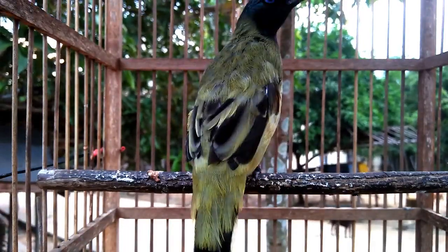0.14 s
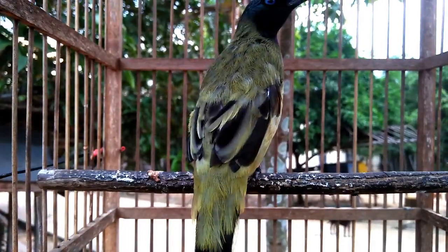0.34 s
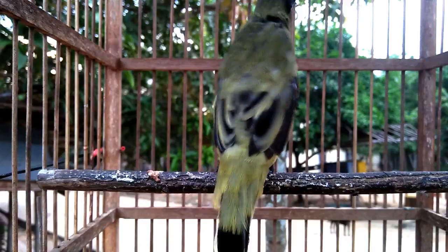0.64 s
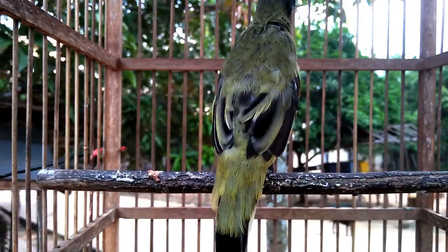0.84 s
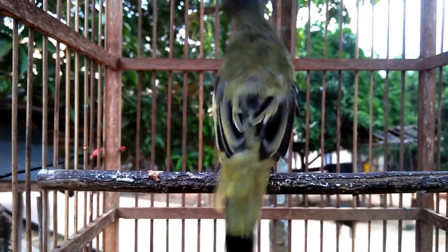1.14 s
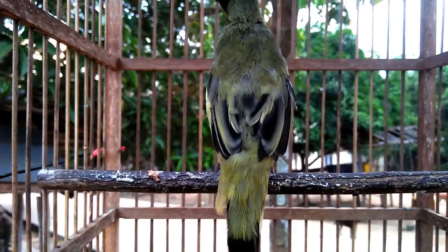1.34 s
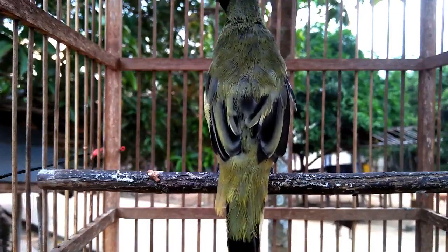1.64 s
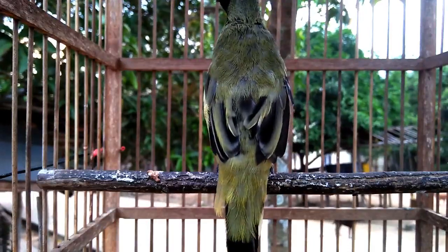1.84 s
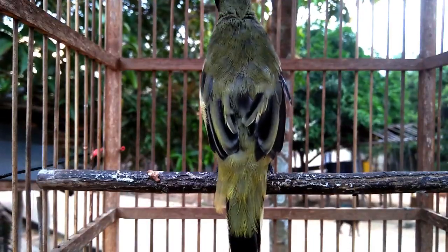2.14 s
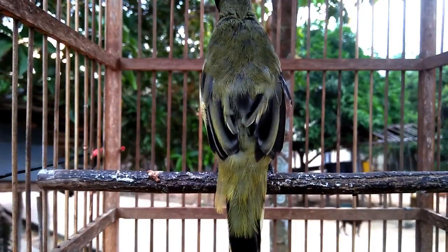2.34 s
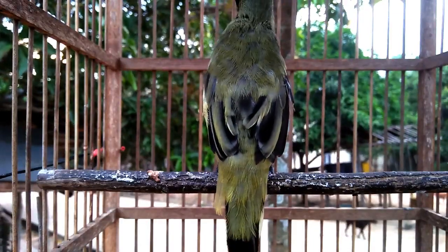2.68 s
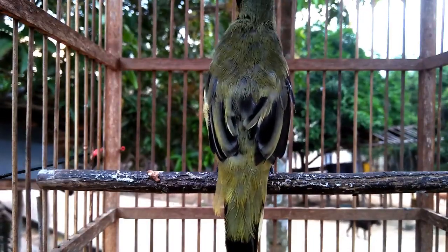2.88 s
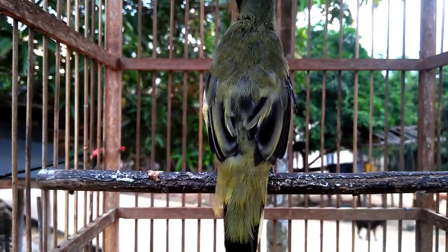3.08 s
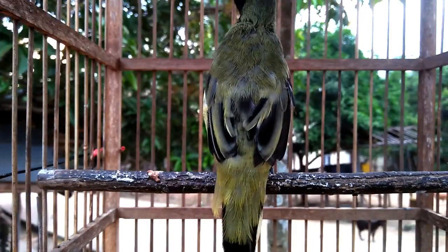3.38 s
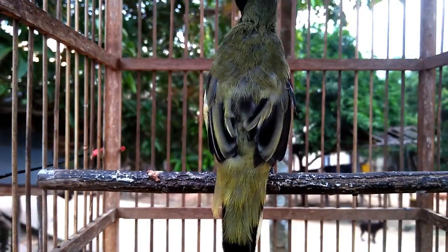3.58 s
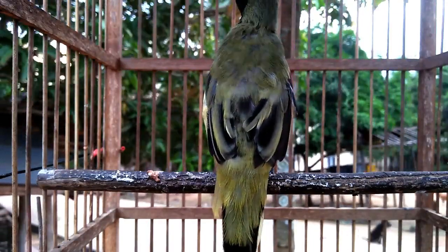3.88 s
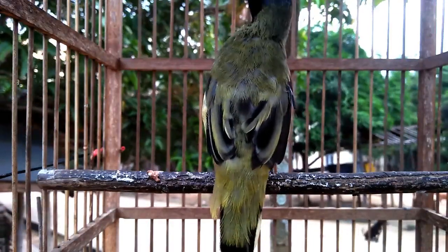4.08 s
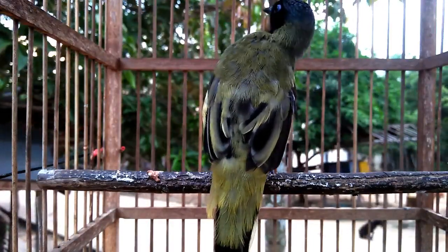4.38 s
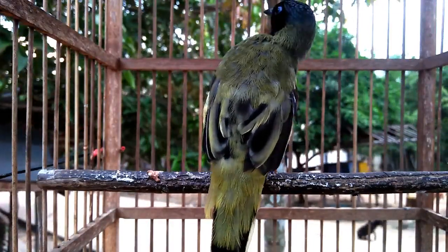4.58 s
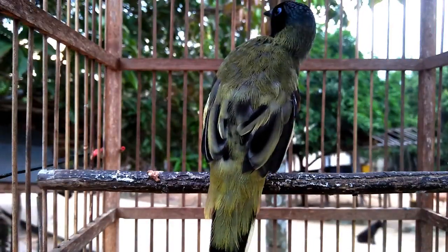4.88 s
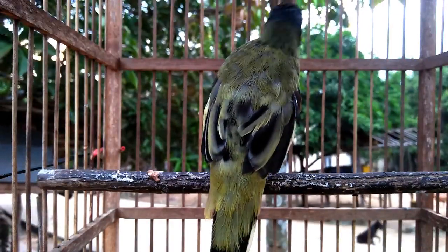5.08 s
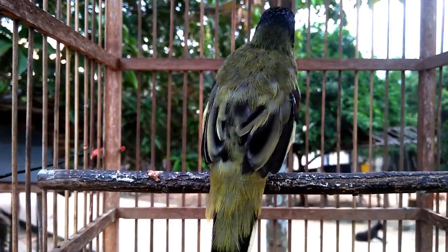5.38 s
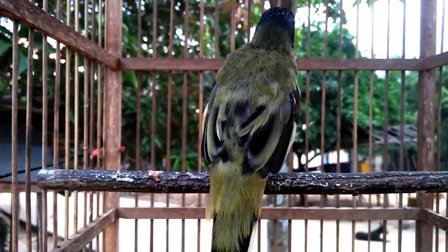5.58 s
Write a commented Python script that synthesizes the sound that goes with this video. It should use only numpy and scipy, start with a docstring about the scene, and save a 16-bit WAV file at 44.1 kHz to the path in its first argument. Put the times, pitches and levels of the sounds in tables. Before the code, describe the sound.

A caged bird's yard, recorded outdoors with a small stereo microphone: rough squawks open the scene with a long reedy hen call and bright whistled phrases. A second call follows near two seconds, then soft clucks and a lull, and a third call near four. Squawks and clucks thicken at the end. Low lumpy wind buffeting comes and goes under a faint yard wash; treble leans left, rumble right.

```python
"""A hen gives three drawn-out calls: harmonics of a gliding pitch, frayed by noise where it sags.
Other fowl squawk (noise through two throat resonances), cluck (pitch arches) and call far off (glides).
A songbird repeats a three-note whistle, smaller birds chirp in husky glides, and one sharp tick rings.
Air buffets the microphone in lumpy rumble and single pushes; noise gives a faint yard wash and a fine
treble hiss that swells with hen, squawks and song."""
import sys
import numpy as np
from scipy import signal
from scipy.fft import rfft, irfft, next_fast_len
from scipy.io import wavfile
from scipy.ndimage import uniform_filter1d, map_coordinates

SR = 44100
rng = np.random.default_rng(int(sys.argv[2]) if len(sys.argv) > 2 else 0)


def dump(signal):
    """Clip the signal to [-1, 1] and save it as 16-bit WAV at the path in sys.argv[1]."""
    limited = np.clip(np.atleast_2d(signal).T, -1, 1)
    pcm = np.round(limited * 32767).astype(np.int16)
    wavfile.write(sys.argv[1], SR, pcm)


N = 252252
T = np.arange(N) / SR

# hoarse squawks: peak t/s, rise/s, fall/s (20 dB each), lower resonance level/dB,
# upper resonance f/Hz, its level/dB, relative hiss level/dB
SQUAWKS = [(.01, 0.029, 0.084, -41.5, 2190, -40.5, -46), (.217, 0.064, 0.22, -37.5, 1815, -37, -53),
           (.5, 0.17, 0.17, -47, 1710, -44.5, -72), (.95, 0.12, .11, -52.5, 2099, -52, -54),
           (1.17, 0.069, 0.13, -46, 2220, -46.5, -68), (1.26, 0.074, 0.082, -45, 1780, -41.5, -55.5),
           (1.57, 0.04, 0.44, -61, 2380, -59.5, -63), (1.819, 0.11, 0.095, -46, 3150, -50.5, -74),
           (2.25, 0.024, 0.067, -46.5, 2020, -59, -52.5), (2.98, 0.058, 0.68, -66, 2468, -45.5, -73),
           (3.03, 0.1, 0.21, -70, 3870, -54.5, -65), (3.08, 0.13, 0.12, -52, 2866, -44.5, -54),
           (3.125, 0.056, 0.094, -40, 1401, -40, -54.5), (3.453, 0.017, 0.18, -46, 1344, -54.5, -108),
           (3.82, 0.12, 0.2, -53, 2340, -43, -55), (4.07, .046, 0.17, -58, 2397, -43.5, -60),
           (4.17, 0.086, 0.21, -44, 1498, -42, -53.5), (4.83, 0.11, 0.16, -58, 1940, -64.5, -63.5),
           (5.09, 0.025, 0.21, -50, 1380, -59, -98), (5.285, 0.038, 0.081, -49, 3180, -60.5, -57),
           (5.375, 0.057, 0.54, -53, 666, -52, -53), (5.525, 0.053, 0.17, -42.5, 2460, -40.5, -43),
           (5.554, 0.016, 0.078, -48, 1410, -40.5, -62)]


def amp(db):
    """Decibels to gain."""
    return 10 ** (np.asarray(db) / 20)


def unit(x):
    """Scale to rms 1."""
    return x / np.sqrt(np.mean(x ** 2) + 1e-20)


def along(points, hz):
    """Interpolate (f/Hz, value) points on a log frequency axis."""
    f, v = np.transpose(points)
    return np.interp(np.log(hz + 1), np.log(f), v)


def curves(rows, t=T):
    """Interpolate each column after the time column at times t."""
    s, *cols = np.transpose(rows)
    return [np.interp(t, s, c) for c in cols]


def wobble(rate_hz, size=N):
    """Smooth random curve of rms 1 through rate_hz knots a second."""
    knots = rng.standard_normal(int(size * rate_hz / SR) + 4)
    return unit(map_coordinates(knots, [np.arange(size) * rate_hz / SR]))


def filtered(x, response):
    """Multiply the spectrum of x by a response of frequency."""
    size = x.shape[-1]
    m = next_fast_len(size + 8192)
    return irfft(rfft(x, m) * response(np.fft.rfftfreq(m, 1 / SR)), m)[..., :size]


def noise(spectrum):
    """Coloured noise of rms 1."""
    return unit(filtered(rng.standard_normal(N), lambda hz: amp(along(spectrum, hz))))


def add(track, s, sound):
    """Mix a sound into a track at time s, clipped to the track."""
    start = round(s * SR)
    sound = sound[max(-start, 0):]
    part = track[max(start, 0):][:len(sound)]
    part += sound[:len(part)]


def span(rows, fade_s=0.005):
    """Sample times from first to last row, and a gate with linear fades."""
    t = np.arange(rows[0][0], rows[-1][0], 1 / SR)
    return t, np.clip(np.minimum(t - t[0], t[-1] - t) / fade_s, 0, 1)


def phase_of(hz):
    """Integrate instantaneous frequency to phase in radians."""
    return 2 * np.pi * np.cumsum(hz) / SR


def swell(t, rise_s, fall_s):
    """A rounded rise to t = 0, then a steady fall; each covers 20 dB."""
    return amp(-20 * np.where(t < 0, (t / rise_s) ** 2, t / fall_s))


def partial(phase, hoarse, width_hz):
    """One harmonic of about rms 1; hoarseness smears a share of its power into a narrow band."""
    share = np.clip(hoarse, 0, 1)
    smear = wobble(width_hz, len(phase)) * np.sin(phase) + wobble(width_hz, len(phase)) * np.cos(phase)
    return np.sqrt(2 * (1 - share)) * np.cos(phase) + np.sqrt(share) * smear


def echo(x, wet_db):
    """Walls and trees answer with a short diffuse tail; total power is roughly kept."""
    # decay of the tail: f/Hz, t60/s
    walls = [(300, 0.2), (1000, 0.33), (3000, 0.39), (10000, 0.022)]
    hz, t, z = signal.stft(rng.standard_normal(SR // 2), SR, nperseg=256)
    decayed = z * amp(-60 * t / along(walls, hz)[:, None])
    tail = signal.istft(decayed, SR, nperseg=256)[1]
    delayed = np.pad(tail, (SR // 150, 0))
    wet = signal.fftconvolve(x, delayed / np.linalg.norm(tail))[:N]
    return (x + amp(wet_db) * wet) / np.hypot(1, amp(wet_db))


def yard(floor_db=-67.5, drift_db=3.37, wash_db=-16, wash_rise_s=0.1, wash_s=0.54):
    """A faint, restless wash of distant noise that swells around each squawk."""
    # distant bustle: f/Hz, relative spectral level/dB
    bustle = [(250, -6), (400, -5.5), (800, 9.5), (1500, 2.5), (2400, -5), (3500, -13.5), (5000, -13.5),
              (9000, -20)]
    wash_power = sum((amp(db + wash_db) * swell(T - s, wash_rise_s, wash_s)) ** 2
                     for s, _, _, db, *_ in SQUAWKS)
    drift = amp(drift_db * wobble(4.3) + 0.91 * wobble(25))
    return np.sqrt(amp(floor_db) ** 2 + wash_power) * drift * noise(bustle)


def wind(deep_db=-1.5, flutter_db=-10, flutter_grows=1.34, churn_db=1.5, lump_db=3, stiff_db=-40,
         puff_db=-3, puff_s=.0031, typical_db=-30, hurry=0.29, cut_hz=36,
         wake_db=-15, wake_rise_s=0.024, wake_s=0.087):
    """Eddies press on the microphone: lumpy rumble, and pushes that swing back and leave a short wake."""
    # air strength: t/s, level/dB
    breeze = [(0, -34.5), (.3, -52.5), (.65, -47), (.8, -61), (1.0, -42), (1.14, -36.5), (1.24, -34),
              (1.38, -39), (1.45, -52), (1.68, -56), (1.8, -67), (1.88, -34), (2.04, -36.5), (2.14, -60.5),
              (2.3, -50), (2.4, -43.5), (2.62, -63), (2.72, -83), (2.87, -84), (2.92, -59), (3.13, -55),
              (3.25, -80), (3.6, -67.5), (3.92, -79), (4.03, -47.5), (4.42, -58), (4.62, -48.5),
              (5.17, -53.5), (5.5, -40), (5.62, -46), (5.72, -66)]
    # single puffs: t/s, relative level/dB
    puffs = [(.085, -37), (.169, -20.5), (0.241, -26.5), (.347, -29), (0.43, -31), (0.485, -32.5),
             (.902, -37), (0.995, -24.5), (1.214, -24.5), (1.372, -26), (1.477, -22), (1.561, -27),
             (1.603, -39), (1.681, -34.5), (1.871, -27.5), (1.939, -31), (1.994, -23), (2.354, -28),
             (2.424, -32.5), (2.496, -35.5), (2.905, -39.5), (3.089, -43), (4.19, -37.5), (4.599, -33.5),
             (5.09, -36.5), (5.22, -38), (5.38, -28.5), (5.567, -30), (5.629, -33)]
    # rumble spectrum: f/Hz, relative spectral level/dB
    deep = [(13, -48), (22, -37), (38, -2.5), (59, 10), (81, 3.5), (120, -6), (160, -34), (260, -120)]
    # flutter spectrum: f/Hz, relative spectral level/dB
    flutter_spectrum = [(59, -30), (100, -3.5), (153, -5.5), (197, -14), (236, -21.5), (301, -17.5),
                        (380, -39), (490, -21), (840, -120)]

    breeze_db, = curves(breeze)
    wakes = sum(amp(db + wake_db) * swell(T - s, wake_rise_s, wake_s) for s, db in puffs)
    strength = np.hypot(amp(breeze_db), wakes)
    # flutter grows faster than the air strength, with extra weight on the wakes
    churned = np.hypot(amp(breeze_db), amp(churn_db) * wakes)
    flutter = amp(stiff_db + flutter_db) * (churned / amp(stiff_db)) ** flutter_grows
    lumps = unit(amp(lump_db * wobble(35)))
    out = lumps * (amp(deep_db) * strength * noise(deep) + flutter * noise(flutter_spectrum))

    t = np.arange(-SR // 40, SR // 20) / SR
    for (s, db), (size, sign) in zip(puffs, rng.standard_normal((len(puffs), 2))):
        # stronger eddies pass faster
        width_s = puff_s * np.exp(0.19 * size) * amp(hurry * (typical_db - db))
        u = (t - .006) / width_s
        add(out, s + t[0], np.sign(sign) * amp(db + puff_db) * 2 * u * np.exp(-u ** 2))
    # the microphone passes little of the slowest pressure swings
    return filtered(out, lambda hz: hz ** 4 / (hz ** 4 + cut_hz ** 4))


def far_fowl(far_db=-2, third_db=-14, fourth_db=-21):
    """Distant crowing and moaning: arched glides with little above the second harmonic."""
    # t/s, length/s, start f/Hz, end f/Hz, arch/Hz, relative level of harmonics 1 and 2/dB
    far_calls = [(3.22, 0.19, 423, 420, 2, -65, -49), (3.45, 0.12, 720, 640, -1.5, -64, -57),
                 (3.412, 0.25, 440, 423.5, 8.5, -58.5, -50), (1.12, .22, 497, 420, 5.5, -65, -50.5),
                 (1.36, 0.193, 455, 408, -6.5, -57.5, -74), (4.5, .17, 436, 450, 2, -62, -69.5),
                 (4.88, .19, 466, 400, 11, -70.5, -60.5), (5.2, 0.109, 513.4, 483, 7.5, -66, -48.5),
                 (5.356, 0.2, 495, 548, 4, -60, -47.5)]
    out = np.zeros(N)
    for s, length_s, start_hz, end_hz, arch_hz, first_db, second_db in far_calls:
        t, gate = span([(s,), (s + length_s,)], fade_s=0.021)
        u = (t - s) / length_s
        phase = phase_of(start_hz + (end_hz - start_hz) * u + arch_hz * np.sin(np.pi * u))
        levels_db = (first_db, second_db, second_db + third_db, second_db + fourth_db)
        voice = sum(amp(db + far_db) * partial(k * phase, 0.38, width_hz=70.1)
                    for k, db in enumerate(levels_db, 1))
        add(out, s, gate * voice)
    return out


def chirps(spread=0.09):
    """Short glides wholly frayed into bands whose width is a share of the start pitch."""
    # t/s, length/s, start f/Hz, end f/Hz, level/dB
    chirp_rows = [(.19, 0.0604, 3770, 4243, -57), (.456, 0.067, 4360, 4440, -59.5),
                  (0.771, 0.16, 2650, 2786, -51.5), (0.833, 0.041, 3740, 3620, -57),
                  (.995, 0.062, 12700, 12900, -63), (1.1, .1, 13900, 13300, -70),
                  (1.546, .088, 4580, 4590, -56.5), (3.223, 0.082, 4400, 5560, -63),
                  (3.3, 0.056, 5020, 4370, -66), (3.304, 0.11, 5660, 5920, -64),
                  (4.094, 0.072, 4510, 4730, -59), (4.2, 0.036, 4610, 4640, -56),
                  (4.281, 0.1, 5300, 6040, -58), (4.739, .13, 3980, 1894, -62.5),
                  (4.781, 0.036, 3985, 4110, -54), (4.758, 0.059, 5240, 5020, -61.5),
                  (4.968, 0.015, 3480, 3430, -63.5)]
    out = np.zeros(N)
    for s, length_s, start_hz, end_hz, db in chirp_rows:
        t, gate = span([(s,), (s + length_s,)], fade_s=0.0069)
        phase = phase_of(np.linspace(start_hz, end_hz, len(t)))
        add(out, s, amp(db) * gate * partial(phase, 1.0, spread * start_hz))
    return out


def ticks(t60_s=0.031, tick_db=-9):
    """A bright tick: decaying sine ring plus high-passed noise."""
    # t/s, relative level/dB, ring f/Hz
    tick_rows = [(0.6818, -30.5, 7230)]
    out, t = np.zeros(N), np.arange(SR // 20) / SR
    for s, db, hz in tick_rows:
        crack = filtered(rng.standard_normal(len(t)), lambda f: f > 5000)
        decay = amp(db + tick_db - 60 * t / t60_s)
        add(out, s, decay * (np.sin(2 * np.pi * hz * t) + 1.2 * crack))
    return out


def songbird(trill=0.019, burr=0.079):
    """A burry whistle, randomly jittered in pitch: a whip upward, a pip and a falling slur."""
    # note shapes: t from note start/s, f/Hz, relative level/dB
    whip = [(0, 2830, -17.5), (0.019, 3000, -4.5), (.03, 3450, -0.5), (.042, 3600, -14), (.056, 3280, -3),
            (.085, 3300, -14.5)]
    pip = [(0, 2303, 0.5), (.01, 2518, 0), (0.021, 2620, -0.5), (.035, 2410, -41)]
    slur = [(0, 2495, -2), (0.014, 2770, -9.5), (.028, 2581, -9), (.045, 2351, -7.5), (.075, 2170, -11),
            (0.102, 2050, -66)]
    # phrases: whip t/s, level/dB, pip t/s, level/dB, slur t/s, level/dB (levels added to the shapes)
    phrases = [(.233, -32.5, .352, -40, .42, -31), (0.881, -33, 1.007, -40, 1.072, -33.5),
               (1.617, -36.5, 1.73, -43.5, 1.797, -33.5), (3.077, -38, 3.197, -41.5, 3.26, -33)]
    out = np.zeros(N)
    for phrase in phrases:
        for note, s, db in zip((whip, pip, slur), phrase[::2], phrase[1::2]):
            t, gate = span(note, fade_s=0.0021)
            hz, shape_db = curves(note, t)
            phase = phase_of(hz * (1 + trill * wobble(305.2, len(t))))
            whistle = partial(phase, burr, width_hz=550) + amp(-35.5) * np.sin(2 * phase)
            add(out, s, gate * amp(db + shape_db) * whistle)
    return out


def clucks(arch=0.097, cluck_db=-4, attack_s=0.0045):
    """A cluck bursts open into one short arch of pitch with two weaker overtones."""
    # t/s, relative level/dB, nominal f/Hz, length/s, overtone level/dB re fundamental
    cluck_rows = [(.177, -15, 900, 0.0052, -10.5), (0.204, -27, 1080, 0.006, -7),
                  (0.212, -23.5, 1750, 0.0097, -19), (2.283, -44, 644.5, 0.049, -17.5),
                  (2.396, -50.5, 618, 0.026, -5.5), (2.526, -53.5, 617, 0.036, -6),
                  (2.614, -42, 658, 0.034, -15), (2.684, -50, 904, 0.06, -20),
                  (2.754, -53.5, 600, 0.031, -22), (2.921, -44, 1072, 0.068, -7.5),
                  (4.702, -49.5, 1220, 0.023, -14), (4.875, -49.5, 808, 0.057, -20),
                  (4.963, -53, 911, .025, -10), (5.077, -34.5, 864, 0.0098, -36),
                  (5.161, -43, 1060, 0.022, -16.5), (5.257, -44, 1510, 0.045, -27),
                  (5.262, -39.5, 969, 0.034, -20), (5.335, -43, 1010, 0.019, -15),
                  (5.482, -25, 750, 0.055, -18.5), (5.51, -29.5, 783, 0.031, -8),
                  (5.569, -37, 753, .04, -18), (5.639, -35.5, 804, 0.022, -12),
                  (5.647, -31.5, 1357, 0.015, -26)]
    out = np.zeros(N)
    for s, db, hz, length_s, bright_db in cluck_rows:
        t = np.arange(int(length_s * SR)) / SR
        envelope = (1 - np.exp(-t / attack_s)) * (1 - (t / length_s) ** 3)
        phase = phase_of(hz * (1 + arch * (np.sin(np.pi * t / length_s) - .8)))
        fundamental = partial(phase, 0.044, width_hz=330)
        second = partial(2 * phase, 0.35, width_hz=580)
        third = 0.59 * partial(3 * phase, 1.0, width_hz=373)
        voice = fundamental + amp(bright_db) * (second + third)
        add(out, s, amp(db + cluck_db) * envelope * voice)
    return out


def throat(air, centre_hz, q):
    """Three cascaded band-pass resonances shape the air; rms 1."""
    def response(f):
        through = 1j * f * centre_hz
        return (through / (q * (centre_hz ** 2 - f ** 2) + through)) ** 3
    return unit(filtered(air, response))


def squawks(rattle_db=2.0, rattle_hz=130, low_hz=1009, low_q=2.31, high_q=2.15):
    """Chaotic, rattling air rings two resonances of the throat."""
    out = np.zeros(N)
    t = np.arange(-SR // 4, SR // 2) / SR
    for s, rise_s, fall_s, low_db, high_hz, high_db, _ in SQUAWKS:
        air = rng.standard_normal(len(t)) * amp(rattle_db * wobble(rattle_hz, len(t)))
        low = amp(low_db) * throat(air, low_hz, low_q)
        high = amp(high_db) * throat(air, high_hz, high_q)
        add(out, s + t[0], swell(t, rise_s, fall_s) * (low + high))
    return out


def hiss(hen_air, song, hiss_db=-2, flicker_db=1.54, rest_db=-80, song_db=-26):
    """Fine treble noise swells with hen, squawks and song, slightly different on each side."""
    # f/Hz, relative spectral level/dB
    fizz = [(2500, -15), (4200, -1.5), (5100, -6.5), (6200, -1.5), (7500, 3.5), (8900, 5.5), (10500, -5),
            (12000, -12), (14500, -18)]
    song_power = abs(uniform_filter1d((amp(song_db) * song) ** 2, size=2000))
    power = amp(rest_db) ** 2 + hen_air ** 2 + song_power
    for s, rise_s, fall_s, *_, db in SQUAWKS:
        power = power + (amp(db) * swell(T - s, rise_s, fall_s)) ** 2
    mid, side = noise(fizz), .45 * noise(fizz)
    level = np.sqrt(power) * amp(hiss_db + flicker_db * wobble(70))
    return level * np.array([mid + side, mid - side])


def hen(jitter=0.00304, shimmer_db=1.31, rasp_db=2.5, tremble_db=0.7):
    """Four strong harmonics and a reedy rasp, frayed where pitch sags; also returns her hiss drive."""
    # calls: t/s, f/Hz, harmonic 2 level/dB, harmonic 4 level (edge)/dB
    first_call = [(0, 528.5, -63, -53), (.04, 530, -70, -51), (.12, 499.7, -47, -101),
                  (.2, 498, -47.5, -77), (.31, 540, -38, -41), (.45, 559, -43, -38), (.57, 552.3, -36, -32),
                  (.655, 511, -39, -48), (.7, 556, -40.5, -42), (.75, 551.4, -41, -38),
                  (.81, 541, -41.5, -39.5), (.85, 532.5, -33, -39), (.89, 512, -55, -56),
                  (.95, 503, -45.5, -43), (1.01, 507.5, -62.5, -81)]
    second_call = [(1.601, 487, -64, -95), (1.64, 500, -71, -102), (1.68, 547, -71, -97),
                   (1.822, 542.7, -45.5, -54), (1.901, 563.5, -48, -59), (1.97, 563.7, -40.5, -48.5),
                   (2.022, 570.7, -47, -61), (2.059, 572.3, -38, -43), (2.18, 575.4, -36.5, -36.5),
                   (2.23, 559, -42.5, -36.5), (2.277, 533, -38, -43), (2.31, 495, -49, -56),
                   (2.34, 487, -49, -73)]
    third_call = [(3.5, 485, -61, -88), (3.559, 512, -57, -101), (3.6, 550, -58, -106),
                  (3.659, 566, -55, -74), (3.7, 539, -43.5, -61), (3.849, 564.2, -44, -46.5),
                  (3.919, 565.2, -38.5, -47.5), (3.97, 575, -44, -51.5), (4.03, 575.2, -37.5, -36.5),
                  (4.15, 566.2, -40, -42), (4.21, 576.5, -62, -36.5), (4.27, 568, -43.5, -39),
                  (4.33, 558, -38, -31.5), (4.38, 534, -36.5, -38.5), (4.47, 504.4, -39, -52),
                  (4.54, 471, -62, -60)]
    # weak upper harmonics: f/Hz, relative level/dB
    overtones = [(2800, -20), (3400, -21), (4500, -22), (5200, -31), (6400, -11), (7000, -16), (7900, -19),
                 (8800, -11), (11000, -27), (13500, -35)]
    full_hz, full_edge_db = 570, -37  # pitch and edge in full cry
    # the fundamental grows with pitch and yields to the edge (dB per dB)
    hum_db, hum_db_per_hz, hum_yields = -50.5, 0.23, 0.17
    # harmonic 3 follows the edge (dB per dB) and gains as the pitch sags
    third_db, third_grows, third_db_per_hz = -49.5, 0.9, 0.1291
    air_db, air_grows = -56.5, 0.56  # treble follows the edge too (dB per dB)
    # below clear_hz the voice frays (share of noise)
    clear_hz, least_hoarse, hoarse_per_hz = 547.8, 0.022, 0.0037

    out, air = np.zeros(N), np.zeros(N)
    for call in (first_call, second_call, third_call):
        t, gate = span(call, fade_s=.03)
        pitch_hz, second_db, edge_db = curves(call, t)
        push_db = edge_db - full_edge_db
        hoarse = least_hoarse + hoarse_per_hz * np.maximum(clear_hz - pitch_hz, 0)
        levels_db = (hum_db + hum_db_per_hz * (pitch_hz - full_hz) - hum_yields * push_db,
                     second_db,
                     third_db + third_grows * push_db + third_db_per_hz * (full_hz - pitch_hz),
                     edge_db)
        treble_db = air_db + air_grows * push_db
        phase = phase_of(pitch_hz * (1 + jitter * wobble(133.2, len(t))))
        voice = sum(amp(db + tremble_db * wobble(25.95, len(t))) * partial(k * phase, hoarse, width_hz=270)
                    for k, db in enumerate(levels_db, 1))
        # the reedy edge is rougher than the low harmonics and swells with the hiss
        for k in range(5, 24):
            rasp = amp(treble_db + rasp_db + along(overtones, k * pitch_hz))
            voice += rasp * partial(k * phase, hoarse + .2, width_hz=160)
        add(out, t[0], gate * voice * amp(shimmer_db * wobble(60.36, len(t))))
        add(air, t[0], gate * amp(treble_db))
    return out, air


def ports(hz):
    """The two microphone ports differ in level and phase: treble sits left, rumble right."""
    # f/Hz, left minus right level/dB
    lean = [(60, -5.2), (200, -4.3), (380, -.5), (560, 0), (800, 2.2), (1100, 3.8), (1700, 6.7),
            (2300, 8.2), (3300, 9.5), (8000, 9.3), (13000, 1)]
    # f/Hz, phase lead of left/rad
    lead = [(200, 0.33), (500, 0.64), (1640, 0.78), (4300, 0.15), (9800, -0.98), (15000, -0.11)]
    halves = [.5, -.5]
    gain = amp(np.outer(halves, along(lean, hz))) * np.exp(1j * np.outer(halves, along(lead, hz)))
    return gain / abs(gain.mean(axis=0))


def scene():
    """Near hen, songbird, farther fowl, wind and yard through the two ports."""
    voice, hen_air = hen()
    near = echo(voice, wet_db=-18)
    song = echo(songbird(), wet_db=-6.5)
    farther = echo(clucks(), wet_db=-13) + echo(squawks(), wet_db=-13)
    farther += echo(chirps(), wet_db=-4.0) + echo(far_fowl(), wet_db=-6)
    mono = near + song + farther + ticks() + wind() + yard()
    return filtered(mono + hiss(hen_air, song), ports)


def record(dry, top_hz=14500):
    """The recorder keeps nothing above its band limit."""
    return filtered(dry, lambda hz: hz < top_hz)


dry = scene()
out = record(dry)
dump(out)
```